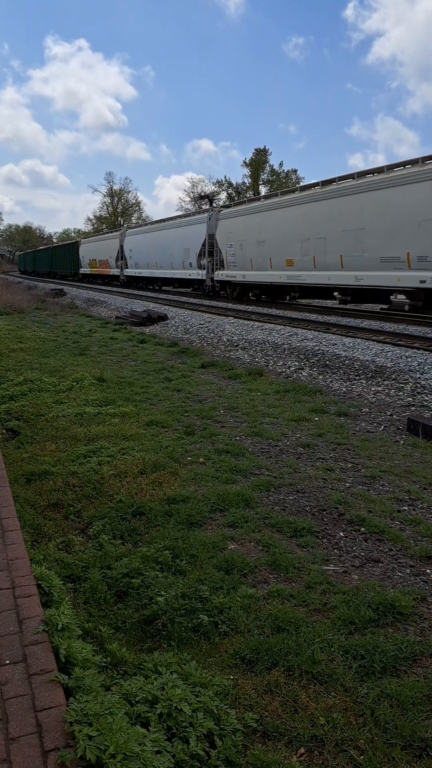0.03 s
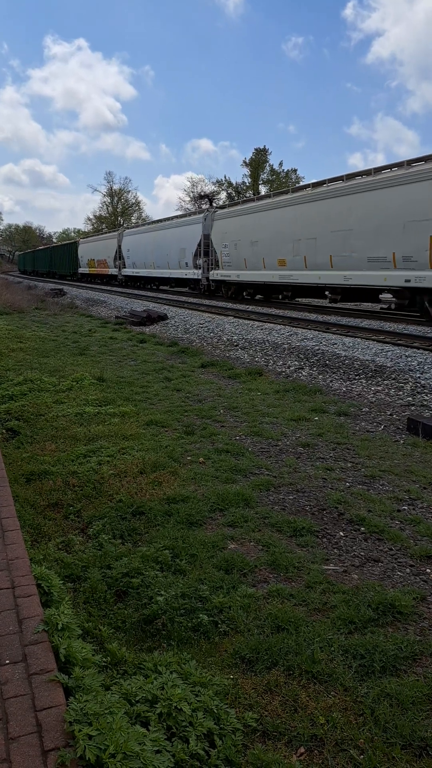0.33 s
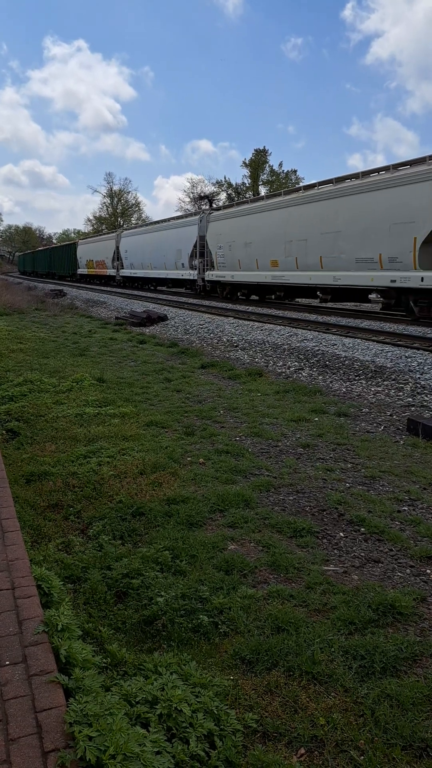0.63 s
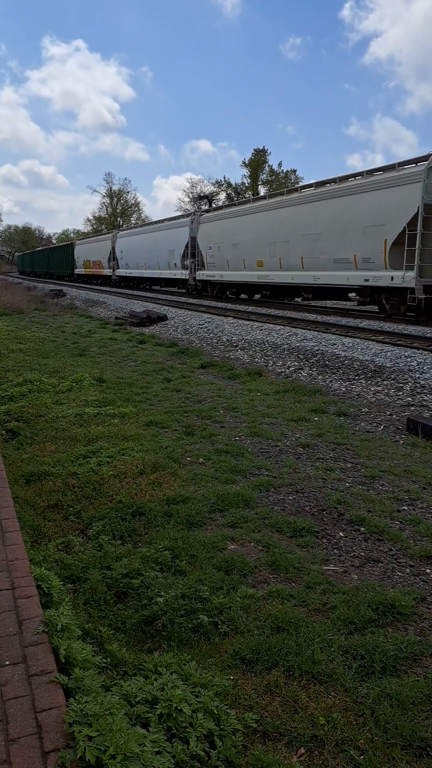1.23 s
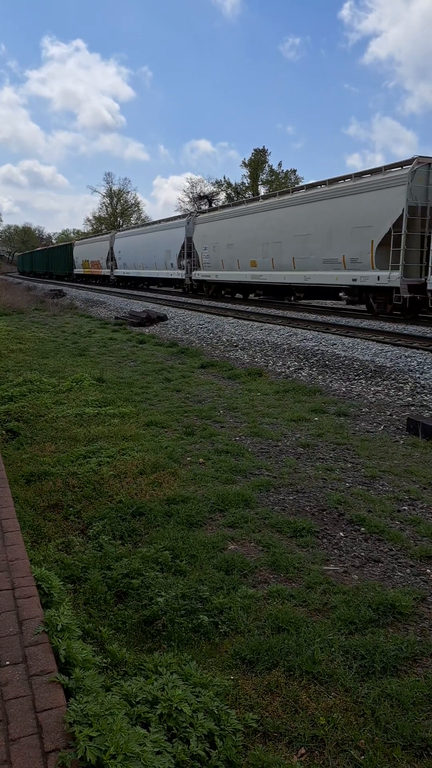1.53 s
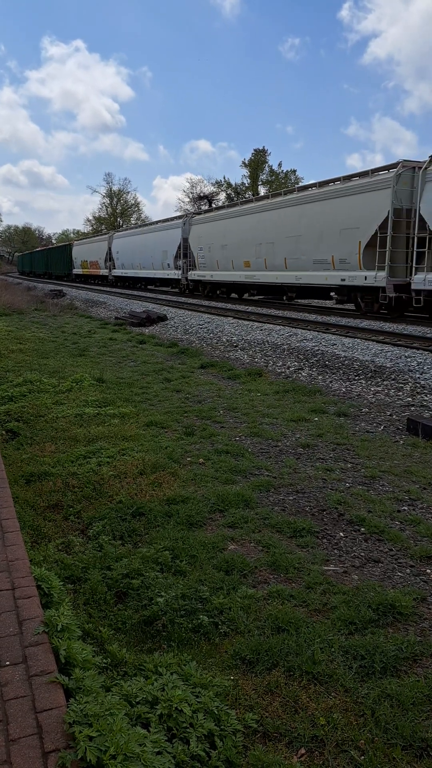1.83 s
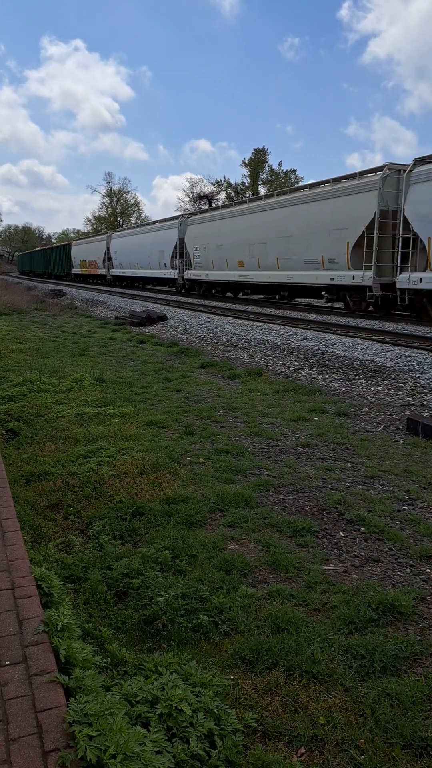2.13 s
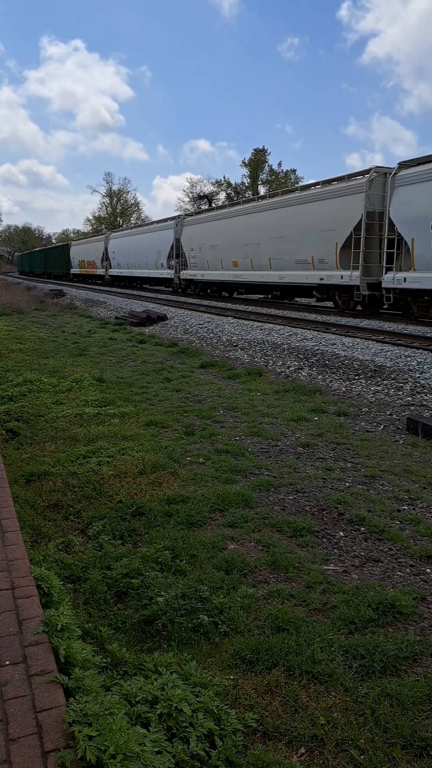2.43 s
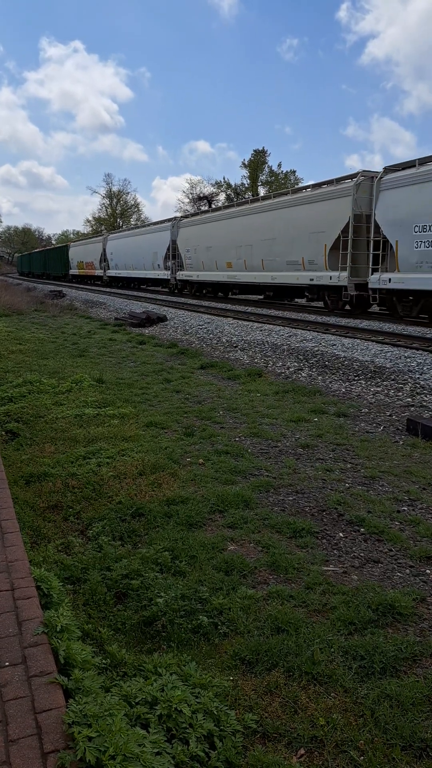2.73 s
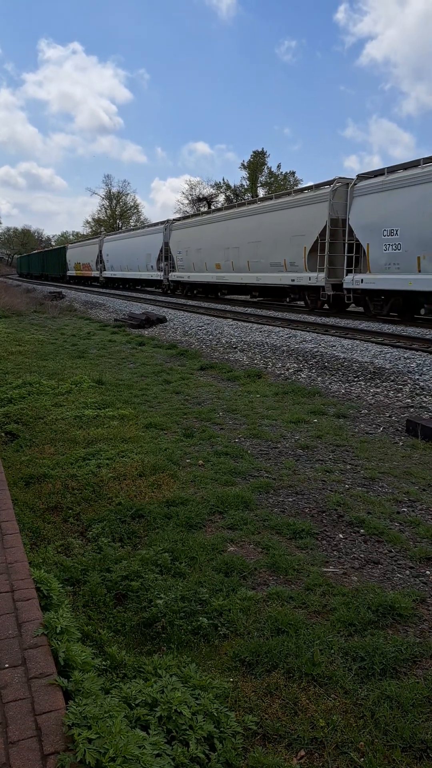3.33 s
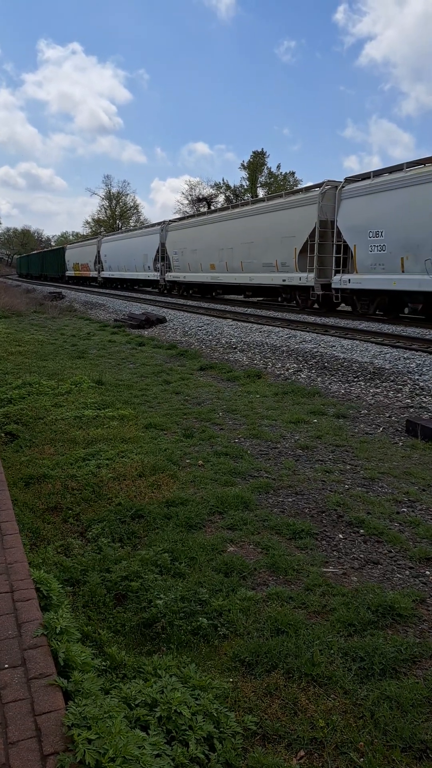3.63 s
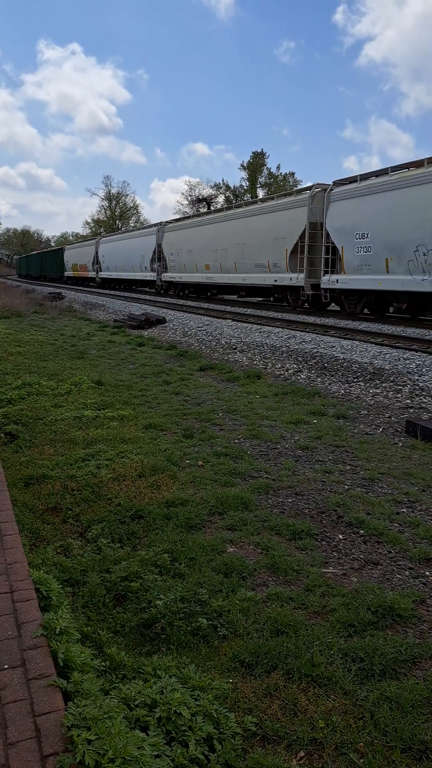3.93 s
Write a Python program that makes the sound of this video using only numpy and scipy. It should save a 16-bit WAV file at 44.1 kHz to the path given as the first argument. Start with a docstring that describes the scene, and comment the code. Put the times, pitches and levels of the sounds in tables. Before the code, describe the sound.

A slow freight train passes outdoors with a steady low diesel throb and rumbling wheels. At about 1 second a coupling bangs in a quick cluster of ringing steel blows. Loose parts clink lightly, and a wheel groans from around 3 seconds. Near 3.9 seconds comes a second, brighter clash with a short, sharp hiss. A distant bird whistles falling chirps about every half second.

```python
"""A slow freight train

A freight train creeps past: its diesel exhaust throbs, its wheels rumble and groan on the rail,
and loose parts clink. Twice the slack runs out of a coupling, and a quick cluster of steel blows
rings through the hopper cars, the second time with a sharp hiss. Far off, a small bird
whistles falling chirps."""
import sys
import numpy as np
from scipy import signal
from scipy.fft import rfft, irfft, next_fast_len
from scipy.io import wavfile
from scipy.ndimage import uniform_filter1d, map_coordinates

SR = 44100
rng = np.random.default_rng(int(sys.argv[2]) if len(sys.argv) > 2 else 0)


def waveform_to_disk(signal):
    """Save audio, clipped to [-1, 1], as 16-bit WAV at the path in sys.argv[1]."""
    frames = np.transpose(np.atleast_2d(signal))
    scaled = np.clip(frames, -1, 1) * 32767
    samples = np.round(scaled).astype(np.int16)
    wavfile.write(sys.argv[1], SR, samples)


N = 176400  # 4 seconds


def amp(db):
    """Turn decibels into a gain."""
    return 10 ** (np.asarray(db) / 20)


def unit(x):
    """Scale x to an average power of 1."""
    return x / np.sqrt(np.mean(x ** 2) + 1e-20)


def along(points, hz):
    """Read between the rows of a (Hz, value) table, on a log scale of frequency."""
    freqs, values = np.transpose(points)
    return np.interp(np.log(hz + 1), np.log(freqs + 1), values)


def clock(size=N):
    """The time of each sample in seconds."""
    return np.arange(size) / SR


def curves(rows):
    """Join timed rows with straight lines: one curve for each column after the time."""
    times, *columns = np.transpose(rows)
    return [np.interp(clock(), times, column) for column in columns]


def wobble(rate):
    """A smooth random curve over the whole scene, through rate points a second."""
    return map_coordinates(rng.standard_normal(2000), [clock() * rate + 2], mode="wrap")


def waver(t, rate):
    """A short random zigzag over the times t, through rate points a second."""
    return np.interp(t * rate, np.arange(256), rng.standard_normal(256))


def filtered(x, response):
    """Scale each frequency of x by the gain response(hz)."""
    size = next_fast_len(x.shape[-1] + 8192)
    gains = response(np.fft.rfftfreq(size, 1 / SR))
    return irfft(rfft(x, size) * gains, size)[..., :x.shape[-1]]


def pan(db):
    """Left and right gains that make the left side db louder at the same total power."""
    gains = amp(np.array([[.5], [-.5]]) * db)
    return gains / np.sqrt(np.mean(gains ** 2, axis=0))


def noise(spectrum, likeness, balance, size=N):
    """Stereo noise of power 1, shaped by tables of tone, left-right likeness and balance."""
    def shape(hz):
        spread = np.arccos(np.clip(along(likeness, hz), -1, 1)) / 2
        return amp(along(spectrum, hz)) * [np.cos(spread), np.sin(spread)]
    mid, side = filtered(rng.standard_normal((2, size)), shape)
    stereo = np.array([mid + side, mid - side])
    return unit(filtered(stereo, lambda hz: pan(along(balance, hz))))


def patchy(x, depth_db):
    """Make x louder and softer in random patches of frequency and time, at power 1."""
    bands = signal.stft(x, nperseg=512)[2]
    patches = uniform_filter1d(rng.standard_normal(bands.shape[1:]), size=4, axis=0)
    patches = uniform_filter1d(patches, size=14, axis=1)
    return unit(signal.istft(bands * amp(depth_db * unit(patches)))[1][:, :N])


def fade(t, t60):
    """A gain that falls by 60 dB every t60 seconds."""
    return np.exp(-np.log(1000) * t / t60)


def dying(x, fade_times):
    """Let each frequency of x die away at its own speed."""
    hz, t, bands = signal.stft(x, SR, nperseg=256)
    return signal.istft(bands * fade(t, along(fade_times, hz)[:, None]))[1][:, :x.shape[-1]]


def add(track, start, x):
    """Mix x into the track from start seconds on."""
    i = round(start * SR)
    track[:, i:i + x.shape[-1]] += x[..., :N - i]


# How alike the train sounds in both ears. Each row: frequency in Hz, likeness (1 is the same).
TRAIN_LIKENESS = [(60, 1), (130, 0.96), (290, 0.99), (640, 0.67), (1410, 0.59), (3100, -0.12),
                  (6820, -0.07), (15000, 0.18)]
# Which side the train is louder on. Each row: frequency in Hz, left minus right in dB.
TRAIN_BALANCE = [(60, -2.5), (130, 0.5), (290, -3), (640, -1), (1410, -4.5), (3100, -4), (6820, 0),
                 (15000, 7.5)]
# The exhaust. Each row: time in seconds, main tone's level in dB, boost for the rest in dB.
EXHAUST_LEVELS = [(0, -17, -5), (.7, -20, -3.5), (1.4, -19, -2.5), (2.3, -24, 0), (2.85, -20, 0),
                  (3.35, -24, 1), (3.8, -17.5, -3)]
# Weaker engine tones, then a thin whine. Each row: pitch in Hz, level before the boost in dB.
BEATING_TONES = [(48.5, -40), (53.4, -29.5), (58.2, -34.5), (68, -48), (72.7, -31), (77.5, -36),
                 (97, -44.5), (116.3, -42), (131, -44)]
WHINE_TONES = [(243, -49.5), (517, -56.5), (1032, -56.5), (2037, -69.5)]
# The engine's low thudding noise. Each row: frequency in Hz, relative strength in dB.
THUD_SPECTRUM = [(15, -25.5), (26, -13), (38, -8), (50, -7.5), (70, -1), (90, -7.5), (130, -13.5),
                 (200, -33), (400, -90.5)]

def engine(main_hz=63.25):
    """A strong exhaust tone throbs as nearby tones beat against it; a faint whine lies above."""
    def tone(hz, drift_radians):
        phase = 2 * np.pi * (hz * clock() + rng.random()) + drift_radians * wobble(2.023)
        return np.sqrt(2) * np.sin(phase) * pan(along(TRAIN_BALANCE, hz))
    main_db, boost_db = curves(EXHAUST_LEVELS)
    beats = sum(amp(db) * (1 + .3 * wobble(1.5)) * tone(hz, .55) for hz, db in BEATING_TONES)
    whine = sum(amp(db + 2.7 * wobble(6)) * tone(hz, 3.94) for hz, db in WHINE_TONES)
    thud = amp(-32) * noise(THUD_SPECTRUM, TRAIN_LIKENESS, TRAIN_BALANCE)
    return amp(main_db) * tone(main_hz, .2) + amp(boost_db) * (beats + thud + whine)


# How loud the airy hiss is. Each row: time in seconds, level in dB.
AIR_LEVELS = [(0, -68), (.9, -68.5), (1.6, -70.5), (3.2, -70.5), (3.8, -72.5)]
# Its tone. Each row: frequency in Hz, relative strength in dB.
AIR_SPECTRUM = [(5000, -30), (8800, -4), (10200, -1.5), (11500, -2.5), (13500, 0), (14500, -2),
                (15700, -10.5)]

def airy_hiss():
    """A faint, very high hiss hangs over the train."""
    return amp(curves(AIR_LEVELS)[0]) * noise(AIR_SPECTRUM, TRAIN_LIKENESS, TRAIN_BALANCE)


# How loud the groaning wheel is. Each row: time in seconds, level in dB.
GROAN_LEVELS = [(0, -55), (2.6, -55.5), (3.05, -45), (3.4, -45), (3.65, -49), (3.85, -38.5), (4, -43.5)]
# Its tone. Each row: frequency in Hz, relative strength in dB.
GROAN_SPECTRUM = [(250, -58), (310, -20), (340, -7), (375, -19.5), (405, -4), (422, 2.5), (440, -3),
                  (480, -26.5), (600, -61)]

def wheel_groan():
    """A wheel groans in a narrow band of low noise, growing as it comes near."""
    return amp(curves(GROAN_LEVELS)[0]) * noise(GROAN_SPECTRUM, TRAIN_LIKENESS, TRAIN_BALANCE)


# How loud the rolling is. Each row: time in seconds, then rumble, roar and hiss levels in dB.
ROLLING_LEVELS = [(0, -36, -44, -55), (.65, -37.5, -43.5, -55), (1, -36.5, -43.5, -53.5),
                  (1.5, -35, -42, -54), (1.85, -37.5, -43.5, -54.5), (2.2, -35.8, -42, -54),
                  (2.8, -35.5, -43, -54.5), (3.05, -33.5, -39.5, -50), (3.3, -32, -40.5, -51.5),
                  (3.55, -33.5, -41.5, -53.5), (3.82, -35, -40.5, -53.5)]
# The tone of those three noises. Each row: frequency in Hz, relative strength in dB.
BODY_RUMBLE = [(60, -43.5), (100, 4), (130, -4.5), (175, -0.5), (205, -7.5), (260, -3.5), (340, -8.5),
               (430, -10), (560, -17), (900, -37.5), (2000, -90)]
WHEEL_ROAR = [(200, -41.5), (450, -9), (600, -1), (1050, -1), (1550, -3.5), (1750, -7), (2000, -6.5),
              (2200, -17), (3500, -40.5), (7000, -92)]
RAIL_HISS = [(1200, -43.5), (2200, -2), (2700, 1), (3400, -2), (3900, -7), (5200, -9), (6200, -15),
             (7500, -18), (8800, -31.5), (15000, -34.5)]

def rolling():
    """As the wheels roll, the car bodies rumble, the wheels roar and the rail hisses."""
    out = np.zeros((2, N))
    jostle_db = .5 * wobble(12)
    for spectrum, level_db in zip((BODY_RUMBLE, WHEEL_ROAR, RAIL_HISS), curves(ROLLING_LEVELS)):
        steady = noise(spectrum, TRAIN_LIKENESS, TRAIN_BALANCE)
        out += amp(level_db + jostle_db) * patchy(steady, depth_db=1.32)
    return out


# The two chirp shapes. Each row: seconds into the chirp, pitch in Hz, relative level in dB.
CHIRP_SHAPES = {"arch": [(0, 4870, -6.5), (.006, 5300, -5), (.021, 5550, -6.5), (.028, 4760, -0.5),
                (.036, 4015, -6), (.041, 3570, -31), (.047, 3950, 0.5), (.052, 4300, 5.5),
                (.058, 3950, -15), (.064, 3465, -14), (.074, 3455, -1), (.088, 3850, -9.5),
                (.105, 3450, -15.5)], "slur": [(0, 4320, -13.5), (.008, 4780, -5), (.02, 4400, -1),
                (.032, 3840, -2.5), (.039, 3500, -14), (.047, 3550, -8), (.057, 3500, -3), (.07, 3300, -9)]}
# The bird's calls. Each row: start in seconds, level in dB, pitch multiplier, shape name.
BIRD_CALLS = [(.088, -61, 1.05, "slur"), (.409, -51, 1, "arch"), (.835, -60, 1, "slur"),
              (.926, -51, .96, "slur"), (1.425, -52.5, .92, "slur"), (1.884, -50, 1, "arch"),
              (2.441, -49, 1.01, "slur"), (3.003, -50, .98, "slur"), (3.415, -58, 1, "slur"),
              (3.517, -50, 1, "arch")]

def bird():
    """A bird whistles slightly rough chirps, scattered by leaves and echoed by trees."""
    out, t = np.zeros((2, N)), clock(SR // 3)
    for start, db, ratio, shape in BIRD_CALLS:
        times, hz, shape_db = np.transpose(CHIRP_SHAPES[shape])
        soft_edges = np.clip(np.minimum(t, times[-1] - t) / .002, 0, 1)
        flutter_db = 1.5 * waver(t, 300)
        envelope = amp(np.interp(t, times, shape_db) + flutter_db) * soft_edges
        pitch = ratio * np.interp(t, times, hz) * (1 + .025 * waver(t, 500))
        add(out, start, amp(db) * envelope * np.sin(2 * np.pi * np.cumsum(pitch) / SR))
    tail = lambda t60: unit(rng.standard_normal((2, len(t))) * fade(t, t60)) / np.sqrt(len(t))
    leaves, trees = amp(-3) * tail(t60=.047), amp(-2) * tail(t60=.28)
    echo = signal.fftconvolve(out, leaves + trees, axes=1)[:, :N]
    return (out + echo) * pan(db=-1.5)


# How alike struck steel sounds in both ears. Each row: frequency in Hz, likeness (1 is the same).
STEEL_LIKENESS = [(200, .9), (1000, 0.5), (2000, 0.089), (4000, -.15), (10000, 0)]
# Small knocks under the cars. Each row: start in seconds, level in dB.
CLINK_HITS = [(.785, -49), (0.832, -62.5), (1.365, -50), (1.989, -58), (2.088, -51), (2.24, -54.5),
              (2.358, -59.5), (2.699, -57), (2.90, -55.5), (2.979, -54), (3.049, -59), (3.142, -57.5),
              (3.223, -48.5), (3.299, -55.5)]
# Their tone. Each row: frequency in Hz, relative strength in dB.
CLINK_SPECTRUM = [(300, -10.5), (1200, 4), (2800, 6), (4500, -3), (8000, -4), (10000, -13.5),
                  (15000, -24.5)]

def clinks():
    """Loose parts around the wheels knock lightly, each knock a short burst of noise."""
    out, t = np.zeros((2, N)), clock(SR // 3)
    envelope = np.minimum(t / .008, 1) * fade(t, t60=.2)
    for start, db in CLINK_HITS:
        burst = noise(CLINK_SPECTRUM, STEEL_LIKENESS, TRAIN_BALANCE, size=len(t))
        add(out, start, amp(db) * envelope * burst)
    return out


# Steel blows. Each row: start in seconds, level in dB, rise in seconds, coupling (dull or bright).
COUPLING_BLOWS = [(1.035, -37.5, .006, "dull"), (1.045, -29.5, .003, "dull"),
                  (1.058, -29.5, 0.0027, "dull"), (1.081, -34, .002, "dull"), (1.103, -41, 0.0032, "dull"),
                  (1.121, -43, .003, "dull"), (3.872, -32.5, .008, "bright"),
                  (3.883, -33.5, .003, "bright"), (3.907, -33, 0.0017, "bright"),
                  (3.921, -39, 0.0024, "bright"), (3.953, -47.5, .004, "bright")]
# Each coupling's dense ring. Each row: frequency in Hz, relative strength in dB.
RING_SPECTRA = {"dull": [(100, -8), (300, -1.5), (600, -8), (950, -4), (1300, -4.5), (1850, -2),
                (2100, 0.5), (2350, -4.5), (3500, -6.5), (4000, -10), (4700, -11.5), (6000, -10.5),
                (7600, -14), (8600, -24.5), (11000, -30.5), (13200, -29), (15700, -41)],
                "bright": [(100, -21.5), (400, -1.5), (700, -10.5), (1150, -3.5), (1480, 3), (1900, -3),
                (2130, -6.5), (2600, 2), (2850, -13.5), (3150, -3.5), (3500, -9), (4400, -9.5),
                (5700, -15.5), (6400, -22), (7200, -32), (9000, -33), (15700, -47.5)]}
# Each coupling's clear notes. Each row: pitch in Hz, relative level in dB, seconds to fade 60 dB.
RING_NOTES = {"dull": [(945, -7, 0.65), (1634, -2.5, .55), (1800, -6.5, .4), (2020, 1, 0.33),
              (2125, 2, 0.33), (2722, -5, .3), (3025, -13.5, .3), (3515, -4, 0.5), (4627, -8, .5),
              (5286, -16, .45), (5846, -14, .25), (6729, -13, .28)], "bright": [(421, -1.5, .8),
              (1120, -11.5, .6), (1473, 2.5, .65), (2590, -5, 0.49), (2600, -3, 0.61), (3213, -9, 0.42),
              (4404, -11, .45)]}
# For each coupling, a gain in dB on all its notes.
NOTES_GAIN_DB = {"dull": -4, "bright": -5}
# Which side each coupling is louder on. Each row: frequency in Hz, left minus right in dB.
COUPLING_BALANCE = {"dull": [(200, -2.5), (1000, -3), (2100, -3.5), (3300, -6.5), (4300, -2), (6000, -2.5),
                    (12000, 1)], "bright": [(200, 5.5), (1400, -4.5), (2600, -7.5), (3100, -3),
                    (3800, -4.5), (7000, 2)]}
# How long the ring and its echo last. Each row: frequency in Hz, seconds to fade 60 dB.
RING_FADES = [(200, 0.71), (1000, 0.56), (2200, 0.41), (4500, 0.3), (8000, 0.17), (14000, .21)]
ECHO_FADES = [(200, 1.5), (1500, 1.6), (3500, 1.2), (6000, 0.53), (14000, .3)]

def couplings():
    """Each blow in a coupling cracks, sets the steel ringing and echoes along cars and trees."""
    out, t = np.zeros((2, N)), clock(SR)
    for start, db, rise, name in COUPLING_BLOWS:
        balance = COUPLING_BALANCE[name]
        notes = np.zeros((2, len(t)))
        for hz, note_db, t60 in RING_NOTES[name]:
            envelope = amp(note_db + rng.normal(0, 1)) * fade(t, t60)
            phase = 2 * np.pi * (hz * t + rng.random((2, 1)))
            blur = .75 * waver(t, 45)  # makes the note less pure
            notes += envelope * pan(along(balance, hz)) * np.sin(phase + blur)
        steel = lambda: noise(RING_SPECTRA[name], STEEL_LIKENESS, balance, size=len(t))
        crack = amp(4) * fade(t, t60=.05) * steel()
        ring = dying(steel(), RING_FADES) + amp(NOTES_GAIN_DB[name]) * notes
        blow = np.minimum(t / rise, 1) * (crack + ring)
        echo = amp(-10.5) * np.minimum(t / .072, 1) * dying(steel(), ECHO_FADES)
        add(out, start, amp(db) * (blow + echo))
    return out


# The tone of sliding steel. Each row: frequency in Hz, relative strength in dB.
SLIDE_SPECTRUM = [(2000, -19.5), (4000, -2), (5600, -5.5), (6400, -10.5), (7000, -5), (8900, -6.5),
                  (9700, 0), (11000, -2.5), (12000, -1.5), (14300, -2.5), (15700, -12)]
# Which side it is louder on. Each row: frequency in Hz, left minus right in dB.
SLIDE_BALANCE = [(5000, 1), (8200, 0), (9200, 6), (10000, 6), (14000, 4)]

def coupling_slide(start_s=3.855, rise_s=.014, hold_s=.06):
    """The bright coupling slides home with a short, sharp hiss."""
    t = np.maximum(clock() - start_s, 0)
    envelope = np.minimum(t / rise_s, 1) * fade(np.maximum(t - hold_s, 0), t60=.36)
    level_db = -40.5 + .8 * wobble(90)
    hiss = patchy(noise(SLIDE_SPECTRUM, STEEL_LIKENESS, SLIDE_BALANCE), depth_db=2.0)
    return amp(level_db) * envelope * hiss


def scene():
    """Add up the train's sounds and the bird."""
    running = engine() + airy_hiss() + wheel_groan() + rolling()
    return running + bird() + clinks() + couplings() + coupling_slide()


def record(dry, top_hz=15740):
    """Cut off the very highest treble."""
    return filtered(dry, lambda hz: hz < top_hz)


dry = scene()
out = record(dry)
waveform_to_disk(out)
```